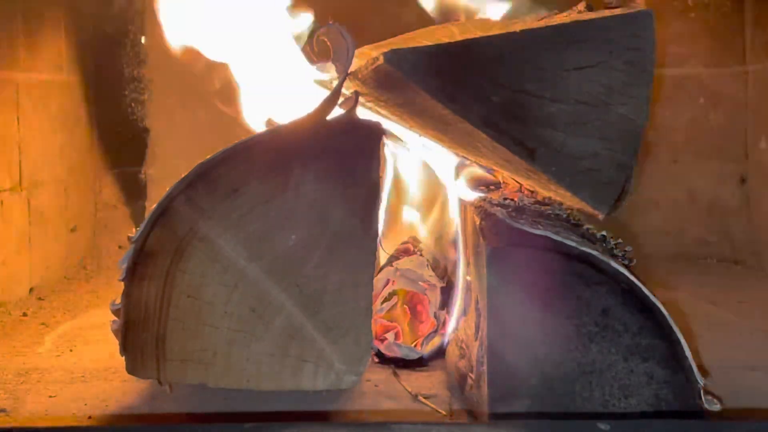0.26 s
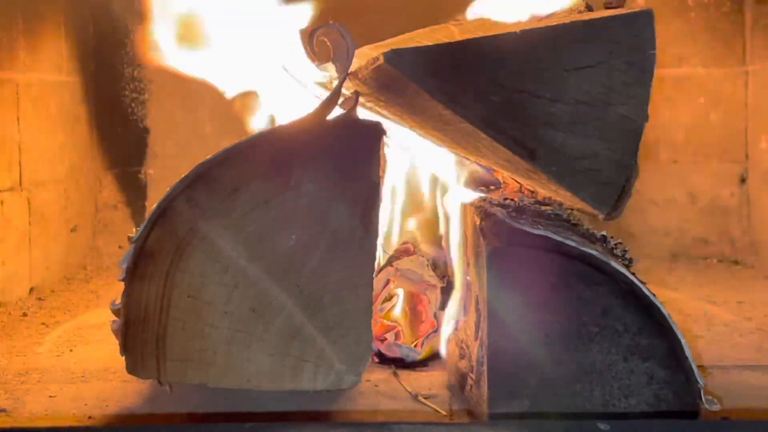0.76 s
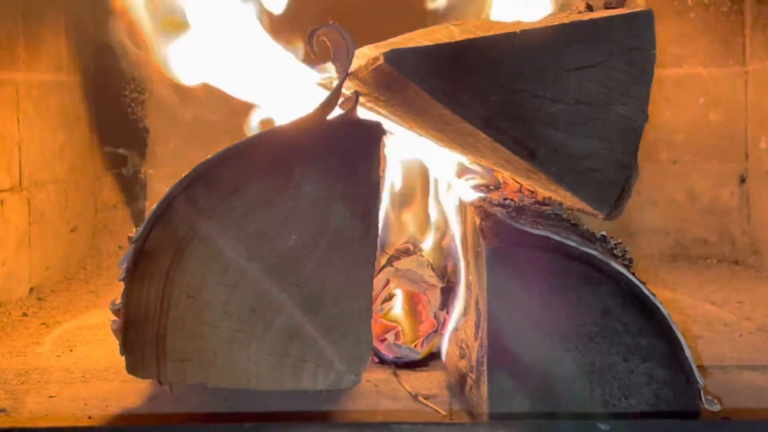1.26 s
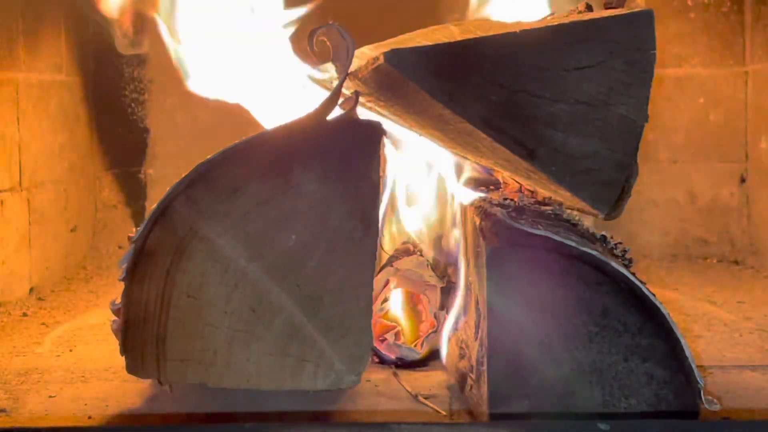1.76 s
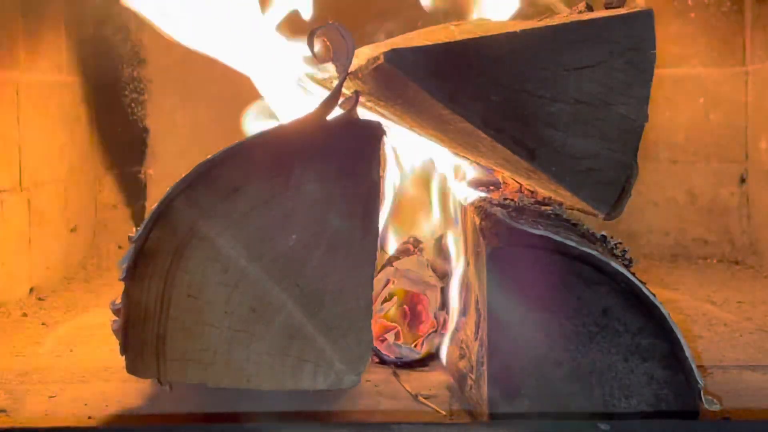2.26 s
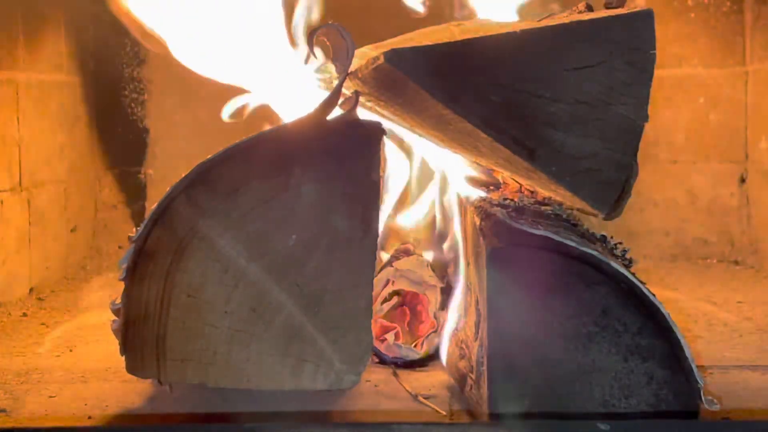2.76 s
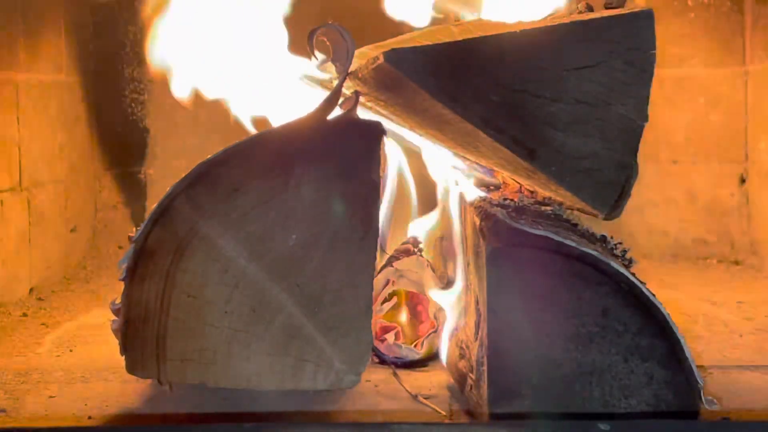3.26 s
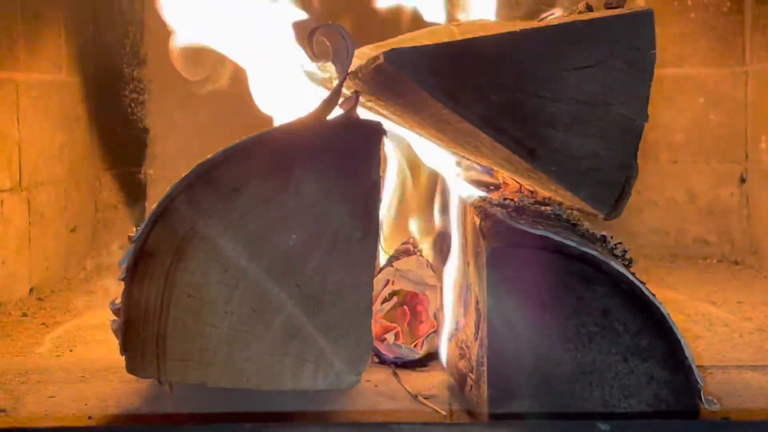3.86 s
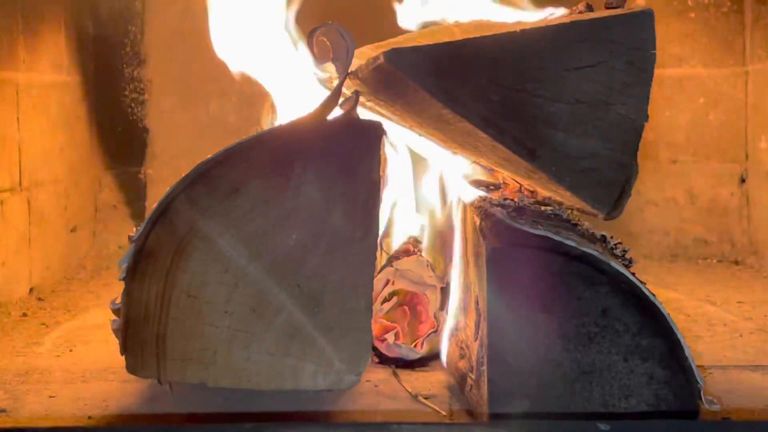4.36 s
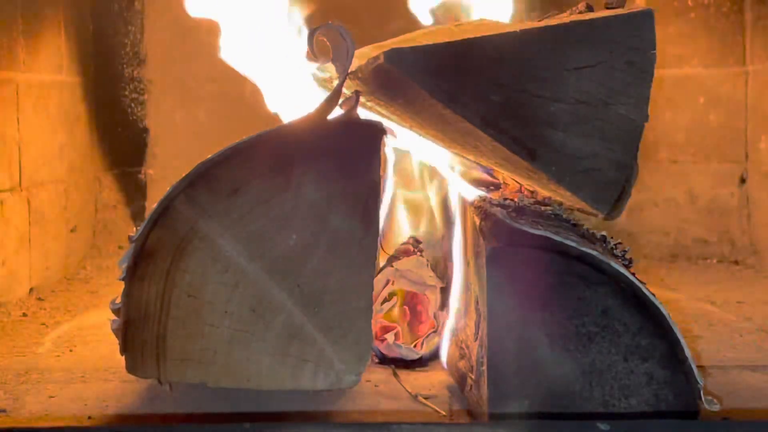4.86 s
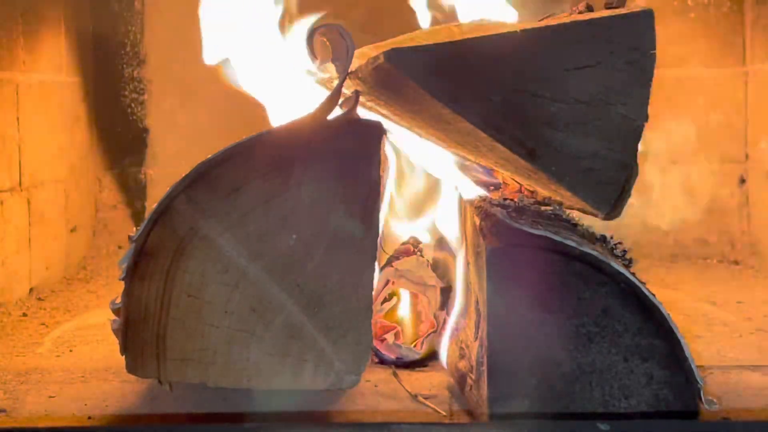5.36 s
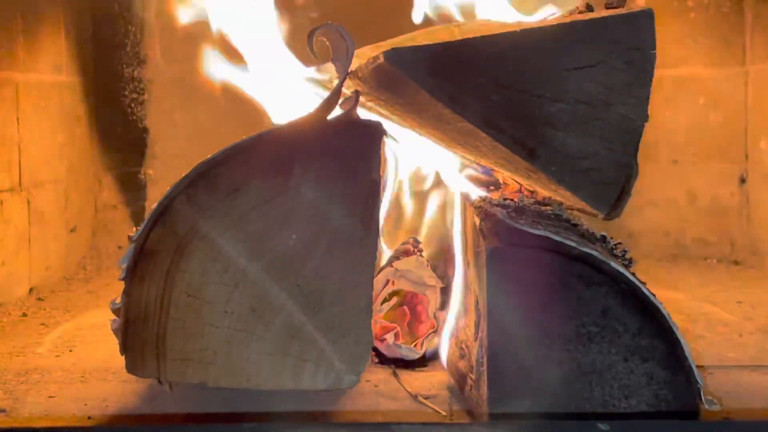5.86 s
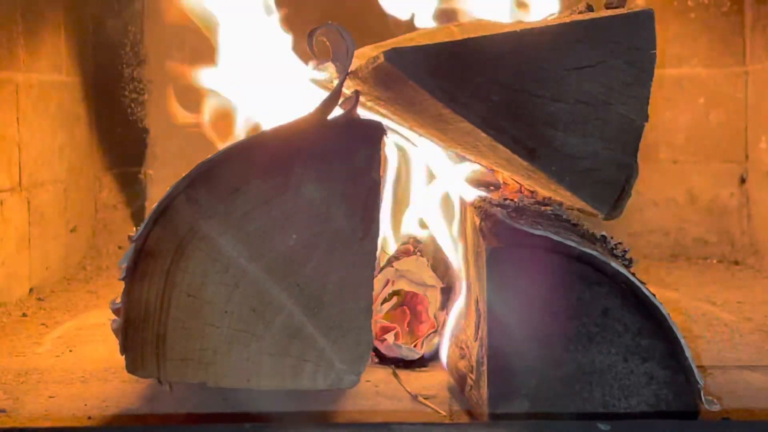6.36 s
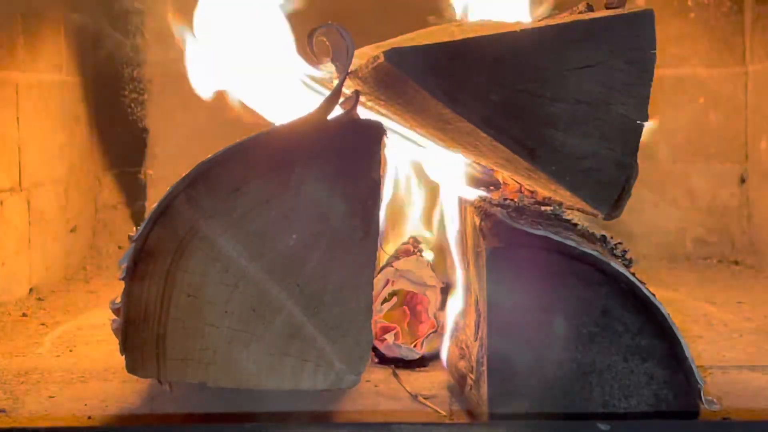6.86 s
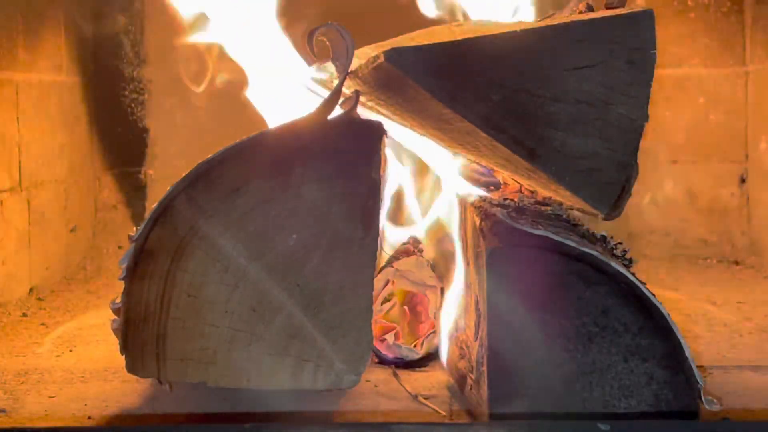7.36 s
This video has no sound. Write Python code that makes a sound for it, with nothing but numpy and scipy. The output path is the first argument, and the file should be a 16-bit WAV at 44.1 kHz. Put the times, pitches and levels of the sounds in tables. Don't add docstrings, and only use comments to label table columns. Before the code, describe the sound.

Split logs burn in a brick oven with a low fluttering rumble, soft hiss, scattered sharp crackles, dull puffs and brief thin steam whistles.

```python
import sys
import numpy as np
from scipy import signal
from scipy.fft import rfft, irfft
from scipy.io import wavfile
from scipy.ndimage import uniform_filter1d

SR = 44100
rng = np.random.default_rng(int(sys.argv[2]) if len(sys.argv) > 2 else 0)


def master_out(mix):
    frames = np.transpose(np.atleast_2d(mix))
    ceiling = np.clip(frames, -1, 1)
    pcm = np.round(ceiling * 32767).astype(np.int16)
    wavfile.write(sys.argv[1], SR, pcm)


def rack_gain(trim_db):
    fader = np.asarray(trim_db, float)
    return 10 ** (fader / 20)


N = 335160
TIME = np.arange(N) / SR

# (frequency [Hz], gain [dB])
CRACK_SPECTRUM = [(2600, -14), (3400, -3), (4500, 0), (5400, 1.5), (6500, -1), (7400, -5), (8500, -37),
                  (9500, -38)]
# (frequency [Hz], gain [dB])
CRACK_TREBLE = [(7000, -20), (8300, -3.5), (9500, 7), (10500, 2), (11800, 3), (13200, -1), (14500, -3),
                (16000, -14), (16500, -48)]


def gain_at(table, hz):
    points_hz, points_db = np.array(table)[:, 0], np.array(table)[:, 1]
    return rack_gain(np.interp(np.log(hz + 1), np.log(points_hz), points_db, -150, -150))


def unit(x):
    return x / np.sqrt(np.mean(x ** 2))


def colour(x, table):
    hz = np.fft.rfftfreq(len(x), 1 / SR)
    return irfft(rfft(x) * gain_at(table, hz), len(x))


def ring(x, hz, width_hz):
    return signal.lfilter(*signal.iirpeak(hz, hz / width_hz, SR), x)


def walk(rate):
    hold = int(SR / rate)
    steps = np.repeat(rng.standard_normal(N // hold + 1), hold)
    slewed = uniform_filter1d(uniform_filter1d(steps, hold), hold)
    return unit(slewed[:N])


def licking(table, shared_db, own_db, rate):
    hz = np.fft.rfftfreq(N, 1 / SR) + 1
    noise = rfft(colour(rng.standard_normal(N), table))
    shared = shared_db * walk(rate)
    out = 0
    for centre in 2 ** np.arange(np.log2(table[0][0]), np.log2(table[-1][0]) + .5, .5):
        share = np.clip(1 - 2 * np.abs(np.log2(hz / centre)), 0, 1)
        out = out + irfft(noise * share, N) * rack_gain(shared + own_db * walk(rate))
    return unit(out)


def add(track, s, burst):
    i = int(s * SR)
    track[i:i + len(burst)] += burst[:N - i]


def even(x, span_s, power):
    return unit(x / uniform_filter1d(x ** 2, int(span_s * SR)) ** power)


def swells(base_db, rows):
    power = rack_gain(2 * base_db)
    for s, db, length_s in rows:
        bell = np.exp(-(2 * (TIME[::32] - s) / length_s) ** 2)
        power = np.maximum(power, rack_gain(2 * db) * bell)
    return np.interp(TIME, TIME[::32], 10 * np.log10(uniform_filter1d(power, size=15)))


def firebox(x, modes, ripple_db):
    hz = np.fft.rfftfreq(N, 1 / SR)
    lift_db = sum(db / (1 + (2 * (hz - f) / w) ** 2) for f, w, db in modes)
    small = np.interp(hz, np.arange(900) * 20., rng.standard_normal(900)) * np.clip(hz / 900, 0, 1)
    return irfft(rfft(x) * rack_gain(lift_db + ripple_db * small), N)


def burning_levels():
    # (time [s], level [dB])
    vigour = [(0, -43), (.4, -43), (1.2, -40.5), (1.7, -43.5), (2.1, -43), (2.8, -43), (3.5, -42.5),
              (3.9, -43.5), (4.3, -42.5), (4.5, -46), (4.95, -45.5), (5.15, -47.5), (5.5, -44.5),
              (5.9, -44.5), (6.4, -44), (7, -40.5), (7.5, -41), (7.6, -53)]
    # (time [s], peak level [dB], length [s])
    surges = [(0.113, -38.5, 0.034), (0.3, -38.5, 0.03), (0.343, -38, 0.037), (0.635, -32.5, 0.048),
              (0.79, -38.5, 0.119), (0.943, -31, 0.013), (1.2, -33.5, 0.03), (1.249, -33.5, 0.048),
              (1.359, -40, 0.025), (1.427, -39, 0.05), (1.516, -31.5, 0.019), (1.584, -38.5, 0.23),
              (1.63, -39, 0.134), (1.839, -37, 0.019), (2.02, -40, 0.071), (2.369, -35.5, 0.027),
              (2.468, -37, 0.082), (2.725, -33, 0.098), (2.822, -39.5, 0.1), (3.065, -36, 0.046),
              (3.323, -37.5, 0.048), (3.74, -40.5, 0.18), (4.5, -39.5, 0.056), (5.031, -36.5, 0.084),
              (5.12, -38.5, 0.14), (5.203, -35, 0.055), (5.596, -43.5, 0.063), (5.746, -36.5, 0.067),
              (6.071, -37.5, 0.073), (6.336, -38, 0.049), (6.867, -39, 0.072), (7.06, -37.5, 0.048),
              (7.264, -39, 0.058), (7.391, -37, 0.022)]
    # (time [s], peak level [dB])
    gulps = [(0.367, -53), (0.678, -50), (0.893, -39.5), (1.203, -45.5), (1.432, -42), (1.843, -41),
             (2.334, -46), (2.717, -54), (3.058, -41), (3.432, -36.5), (3.69, -48), (3.89, -43),
             (4.515, -51), (5.032, -49), (5.611, -40), (5.744, -50), (5.962, -46), (6.636, -47.0),
             (6.806, -43), (6.91, -47), (7.081, -44), (7.394, -41)]
    # (time [s], peak level [dB])
    licks = [(0.294, -49), (0.469, -44.5), (0.614, -51), (0.787, -48.5), (1.189, -56), (1.256, -49),
             (1.359, -50), (1.465, -47), (1.634, -45.5), (1.712, -49), (1.841, -52), (2.227, -53),
             (2.357, -51.5), (2.457, -49.5), (2.751, -48.5), (3.105, -49.5), (3.737, -52.5), (4.403, -48),
             (5.032, -49.5), (5.401, -53), (5.921, -48), (6.525, -49), (7.163, -47), (7.309, -47),
             (0.25, -50.5), (3.33, -54), (3.546, -52), (4.133, -55), (4.676, -53), (5.696, -50.5),
             (6.64, -48), (7.386, -53)]
    gulp_s, lick_s = 0.05, 0.034
    vigour_db = np.interp(TIME[::32], *np.transpose(vigour))
    puffing = walk(22.025)[::32]
    change_db = vigour_db - vigour_db.mean()

    draught_base_db = -50.5 + 0.53 * change_db + 2.5 * walk(11.0)[::32]
    draught_db = swells(draught_base_db, [(s, db, gulp_s) for s, db in gulps])
    flutter_base_db = -54.5 + 0.21 * change_db + 1.63 * puffing
    flutter_db = swells(flutter_base_db, [(s, db + 1.0, lick_s) for s, db in licks])
    rumble_db = swells(vigour_db - 2.5 + 2.8 * puffing, surges) + 0.4
    flutter_db = flutter_db + 0.34 * (rumble_db - rumble_db.mean())
    roar_db = -70.5 + 0.21 * (flutter_db - flutter_db.mean())
    return draught_db, rumble_db, flutter_db, roar_db


def flame():
    # (frequency [Hz], level [dB per Hz])
    rumble_spectrum = [(12, -65), (28, -18), (45, -4.5), (103, 1.5), (138, -0.5), (190, -18.5), (250, -50),
                       (420, -120)]
    flutter_spectrum = [(110, -21.5), (190, 3), (236, -2), (296, 2), (410, -9.5), (469, -9), (650, -18),
                        (731, -16.5), (860, -23.5), (1090, -28.5), (1240, -28.5), (1550, -32),
                        (1650, -39.5), (2140, -42.5), (3630, -120)]
    hiss_spectrum = [(900, -28), (1300, -6.5), (1600, -8), (1750, -1.5), (1900, 1.5), (2400, -2),
                     (2900, -5), (3600, -8), (4200, -9), (5500, -11.5), (7000, -12.5), (9200, -7.5),
                     (10500, -13), (12000, -11), (13200, -14), (15700, -13), (16300, -49)]
    wall_spectrum = [(24, -40), (40, -7), (96, -7.5), (130, 1), (220, -12.5), (297, -11), (390, -13),
                     (594, -12), (646, -8.5), (703, -12), (905, -13), (1090, -22.5), (1310, -23),
                     (1780, -17.5), (2250, -31.5), (2920, -66), (4950, -120)]
    # (frequency [Hz], width [Hz], lift [dB])
    box_modes = [(214.5, 12, 1.5), (339.2, 9.7, 3.5), (473.4, 23, 3.5), (915, 41, 5.5), (1226, 13, 6),
                 (1828, 16, 6), (1840, 14, 0.5), (2290, 440, 0), (2880, 32, -0.5), (4150, 120, 5),
                 (5410, 200, 1)]
    hiss_level_db, wall_level_db = -64, -61
    draught_db, rumble_db, flutter_db, roar_db = burning_levels()

    low = colour(rng.standard_normal(N), rumble_spectrum)
    draught = signal.sosfiltfilt(signal.butter(3, 80, fs=SR, output="sos"), low)
    rumble = even(low - draught, 0.052, 0.25) * rack_gain(rumble_db)
    low = even(draught, 0.089, 0.14) * rack_gain(draught_db) + rumble

    flutter = licking(flutter_spectrum, shared_db=1.0, own_db=1.32, rate=48.)
    roar = signal.sosfiltfilt(signal.butter(2, 650, "high", fs=SR, output="sos"), flutter)
    flutter = even(flutter - roar, 0.052, 0.41) * rack_gain(flutter_db - 0.35)
    flutter = flutter + even(roar, 0.24, 0.35) * rack_gain(roar_db + 4.5)

    hiss = licking(hiss_spectrum, shared_db=0.5, own_db=1.3, rate=16.) * rack_gain(hiss_level_db)
    walls = licking(wall_spectrum, shared_db=1.5, own_db=2.5, rate=15.0)
    walls = walls * rack_gain(wall_level_db + 0.5 * (flutter_db - flutter_db.mean()))
    scattered = unit(colour(rng.standard_normal(N), hiss_spectrum[8:])) * rack_gain(hiss_level_db - 22.5)
    fire = low + firebox(flutter + hiss, box_modes, ripple_db=1.48)
    return fire, firebox(walls + scattered, [(1757, 32, 4.2)], ripple_db=1.5)


def lens_drive():
    frame_hz, start_s = 29.98, .0005
    frames = np.arange(int(N / SR * frame_hz))
    at = ((start_s + frames / frame_hz) * SR).astype(int)
    chance = rng.standard_normal((len(at), 2))
    jittered = np.clip(at + (7.5 * chance[:, 0]).astype(int), 0, N - 1)
    kicks = np.zeros(N)
    kicks[jittered] = rack_gain(2.4 * chance[:, 1] - 7.3 * (frames % 2))
    return unit(ring(ring(kicks, 719.0, 90.), 745.0, 110.)) * rack_gain(-67.5)


def fizz():
    ticks = (rng.random(N) < 45. / SR) * rack_gain(4.5 * rng.exponential(size=N).clip(0, 3))
    decay = np.exp(-1 / (0.0027 * SR))
    bursts = signal.lfilter([1], [1, -decay], ticks) * rng.standard_normal(N)
    return (colour(bursts, CRACK_SPECTRUM) + rack_gain(-8) * colour(bursts, CRACK_TREBLE)) * rack_gain(-74.0)


def rupture(noise, shape, table):
    cells = rfft(np.roll(noise * shape, 128))
    cells = cells / uniform_filter1d(np.abs(cells) ** 2, size=25) ** .5
    return unit(colour(irfft(cells), table))


def crackles():
    # (time [s], snap level [dB], knock level [dB], treble level [dB])
    loud_cells = [(.1585, -57, -72, -57), (.2209, -42, -51, -35), (.2414, -55, -60, -51),
                  (.2818, -60, -68, -65), (.7327, -59, -70, -62), (.8669, -58, -71, -65),
                  (1.0755, -62, -79, -59), (1.3718, -58, -68, -63), (1.5708, -48, -60, -60),
                  (2.3047, -55, -79, -69), (2.5745, -63, -63, -61), (2.9716, -51.5, -53, -51),
                  (3.266, -63, -64, -63), (3.4116, -64, -61, -72), (3.9814, -60, -57.5, -59),
                  (4.0552, -58.5, -60, -67), (4.3136, -66, -79, -61), (4.4657, -43, -51, -41),
                  (4.6224, -48, -54, -50), (4.8479, -50.5, -54, -49.5), (4.8683, -57, -54, -62),
                  (4.9921, -49, -57, -50.5), (5.5468, -56.5, -64, -58.5), (5.7249, -63, -57.5, -61),
                  (5.9324, -51, -51, -56), (6.1235, -60, -62, -67), (6.1604, -57, -65, -56),
                  (6.3565, -62, -60, -64), (7.0174, -64, -76, -63), (7.3836, -68, -60, -70)]
    # (time [s], snap level [dB])
    faint_cells = [(0.298, -62), (.8295, -67), (1.0485, -67), (1.3219, -69), (1.5309, -63), (1.7444, -67),
                   (1.796, -63), (1.9046, -64), (2.536, -66), (2.7894, -76), (2.9966, -65), (3.1303, -66),
                   (3.1727, -71), (3.883, -63), (4.2256, -66), (4.78, -73), (5.125, -66), (5.7129, -68),
                   (5.8263, -64), (6.112, -66), (6.2307, -66), (6.3131, -73)]
    # (frequency [Hz], gain [dB])
    knock_spectrum = [(1000, -26), (1400, -10), (1800, -3), (2400, 0), (3000, -2), (3800, -3), (4800, -18)]
    # (share, fade [s])
    tails = [
        (1.1, .006),
        (.85, .0055),
        (.55, .0045),
    ]
    spikes = (4., 3.5, 7.)
    # (delay [s], body level [dB], treble level [dB])
    echoes = [
        (.00135, -5, -9),
        (.0024, -10, -14),
    ]
    out, t = np.zeros((2, N)), np.arange(4096) / SR
    edge = (1 - np.exp(-t / 0.00012)) * np.exp(-t / 0.0008)
    cells = list(loud_cells) + [(s, db, db - 4, db) for s, db in faint_cells]
    noises = rng.standard_normal((len(cells), 2, 4, 4096))
    for (s, snap_db, knock_db, treble_db), noise in zip(cells, noises):
        tail = 0.4 * rack_gain(-.15 * (max(snap_db, treble_db) + 39))
        for track, (ragged, *hisses), share in zip(out, noise, (1, .2)):
            ragged = rack_gain(2.5 * uniform_filter1d(np.repeat(ragged, 32)[:4096], 24))
            shapes = [edge + lift * tail * ragged * np.exp(-t / fade_s) for lift, fade_s in tails]
            hisses = [h + spike * (np.arange(4096) == 8) for h, spike in zip(hisses, spikes)]
            spectra = (knock_spectrum, CRACK_SPECTRUM, CRACK_TREBLE)
            knock, snap, treble = map(rupture, hisses, shapes, spectra)
            body = share * rack_gain(-16.0) * (knock * rack_gain(knock_db) + snap * rack_gain(snap_db))
            treble = share * rack_gain(-13.0) * treble * rack_gain(treble_db)
            for delay_s, echo_body_db, echo_treble_db in [(0.00066, 0, 0)] + list(echoes):
                arrival = body * rack_gain(echo_body_db) + treble * rack_gain(echo_treble_db)
                add(track, s + .0006 - 128 / SR + delay_s, arrival)
    return out


def whistles():
    # (time [s], length [s], first pitch [Hz], last pitch [Hz], level [dB])
    jets = [
        (.255, .105, 5680, 5150, -68),
        (1.075, .25, 5100, 4520, -69.5),
        (2.465, .065, 5900, 5700, -68),
        (2.62, .06, 5800, 5600, -70),
    ]
    fade_s = 0.012
    waver = 1 + .004 * walk(150.) + .004 * walk(20.)
    sputter = rack_gain(1.6 * walk(60.))
    out = 0
    for s, length_s, first_hz, last_hz, db in jets:
        pitch_hz = np.interp(TIME, (s, s + length_s), (first_hz, last_hz)) * waver
        phase = 2 * np.pi * np.cumsum(pitch_hz) / SR
        fade = np.clip(np.minimum(TIME - s, s + length_s - TIME) / fade_s, 0, 1)
        out = out + np.sin(phase) * rack_gain(db) * fade
    return out * sputter * rack_gain(-4.5)


def puffs():
    # (time [s], peak level [dB], colour [Hz])
    pockets = [(0.2883, -55.5, 1080), (0.447, -57, 1360), (1.337, -58, 740), (1.464, -49.5, 557),
               (1.642, -57, 650), (3.206, -60, 800), (6.636, -62, 600), (2.79, -60, 3000),
               (2.793, -56, 2300), (2.818, -62, 2400), (3.39, -62, 2400), (1.6597, -55, 1050),
               (1.834, -55, 1180), (2.0064, -64, 900), (2.3623, -51, 880), (4.7237, -56, 1310),
               (5.9322, -57, 1310), (5.982, -59, 1010), (6.515, -63, 1050), (6.654, -50.5, 905),
               (6.8106, -58.5, 1100), (7.0458, -59, 1250), (7.3844, -54, 800)]
    out, t = np.zeros(N), np.arange(2048) / SR
    for (s, db, hz), noise in zip(pockets, rng.standard_normal((len(pockets), 2048))):
        thud = np.sin(2 * np.pi * hz * t) * t * np.exp(-t * hz / .75)
        breath = unit(ring(ring(noise, 0.65 * hz, hz), 0.65 * hz, hz))
        breath = breath * (t / 0.0032) * np.exp(1 - t / 0.0031)
        add(out, s, (thud / np.abs(thud).max() + 0.31 * breath) * rack_gain(db + 6.5))
    return out


def ports(mid, side):
    # (frequency [Hz], phase [turns])
    port_lead = [(2000, .01), (5000, .03), (6300, .1), (7300, .21), (8250, .5), (10000, .75), (11500, 1),
                 (13000, 1.22), (14750, 1.5), (16500, 1.7)]
    half = np.pi * np.interp(np.fft.rfftfreq(N, 1 / SR), *np.transpose(port_lead), left=0)
    total = irfft(rfft(mid) * np.cos(half), N)
    difference = irfft(rfft(mid) * -1j * np.sin(half), N)
    return np.array([total, difference + side])


def drop_bands(x, gaps):
    sharp_s = [.16, .225, .245, .735, 2.575, 2.973, 3.131, 4.316, 4.468, 4.624, 4.85, 4.994, 5.55, 5.935,
               6.162]
    hz, s, cells = signal.stft(x, SR, nperseg=512)
    calm = np.abs(s[:, None] - np.array(sharp_s)).min(axis=1) > .005
    for lo, hi, spared in gaps:
        dropped = np.repeat(rng.random(len(s) // 5 + 1) > spared, 5)[:len(s)]
        cells[(hz > lo) & (hz <= hi)] *= ~(dropped & calm)
    return signal.istft(cells, SR, nperseg=512)[1][:N]


def scene():
    # (frequency [Hz], gain [dB])
    sideways = [(1000, 1), (5800, -9), (7000, -6), (16500, -21)]
    fire, walls = flame()
    tick = lens_drive()
    cracks, scattered = crackles()
    front = fire + tick + fizz() + cracks + whistles() + puffs()
    shade = 0.061 * signal.sosfilt(signal.butter(1, 260., fs=SR, output="sos"), fire)
    mid, side = ports(front, walls + colour(scattered, sideways) + 0.11 * tick - shade)
    fill = [(6000, -54), (8000, 7.5), (11500, 9.5), (13000, -3), (14700, 2), (16500, -6)]
    mid = mid + 0.95 * colour(scattered, fill)
    return np.array([mid + side, mid - side])


def low_pass(x):
    return signal.sosfilt(signal.butter(12, 16510, fs=SR, output="sos"), x)


def record(dry):
    # (low edge [Hz], high edge [Hz], spared share of blocks)
    mid_gaps = [(7550, 7750, .1), (7750, 8450, .02), (8450, 8750, .3), (8750, 9050, .75),
                (13450, 13850, .85), (13850, 14500, .3), (14500, 15550, 0), (15550, 15850, .02),
                (15850, 30000, 0)]
    side_gaps = [(2050, 2300, .5), (2300, 2600, .05), (2600, 6200, 0), (6200, 6500, .7), (6500, 6900, .9),
                 (10400, 11100, .07), (11100, 12300, 0), (12300, 12900, .75), (15850, 30000, 0)]
    dry = signal.sosfilt(signal.butter(3, 36., "high", fs=SR, output="sos"), dry)
    dry = signal.sosfilt(signal.ellip(8, .2, 60, 16300, fs=SR, output="sos"), dry)
    mid = drop_bands((dry[0] + dry[1]) / 2, mid_gaps)
    side = drop_bands((dry[0] - dry[1]) / 2, side_gaps)
    return low_pass(np.array([mid + side, mid - side]))


dry = scene()
out = record(dry)
master_out(out)
```